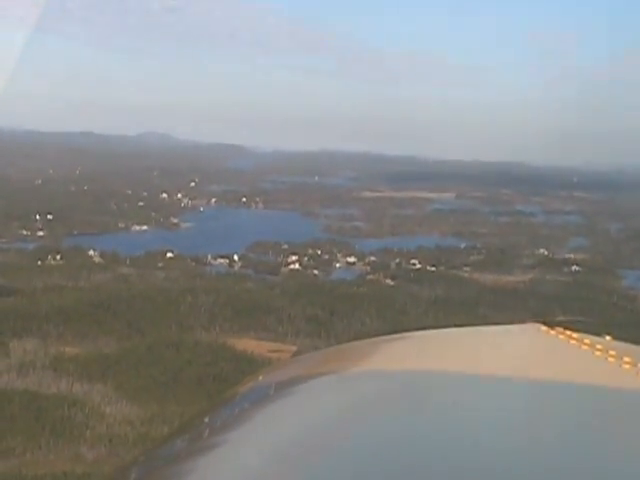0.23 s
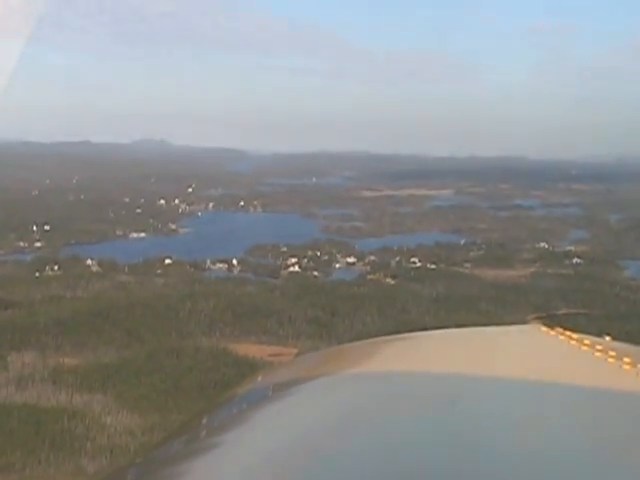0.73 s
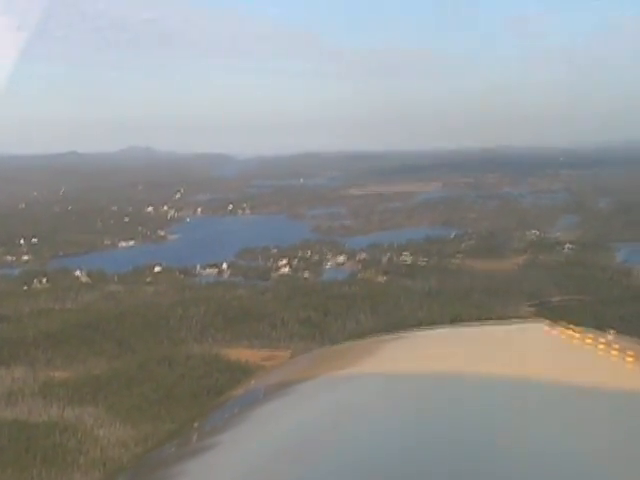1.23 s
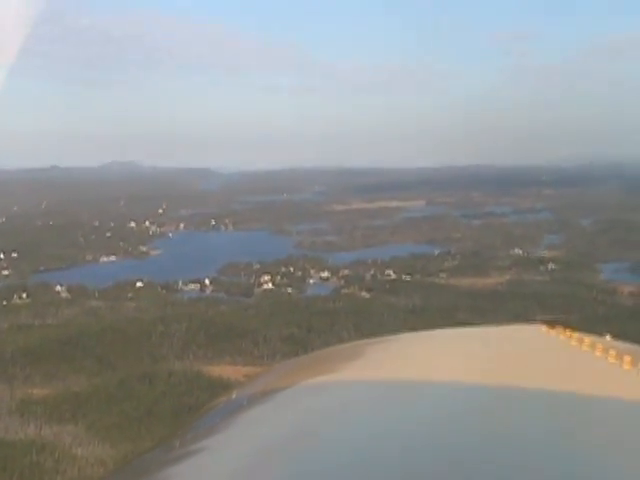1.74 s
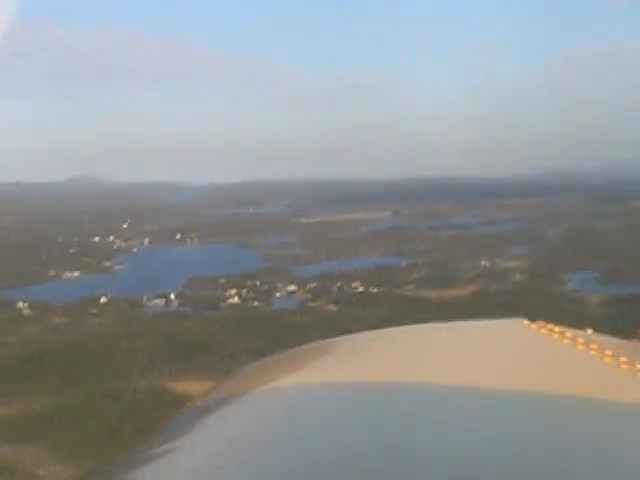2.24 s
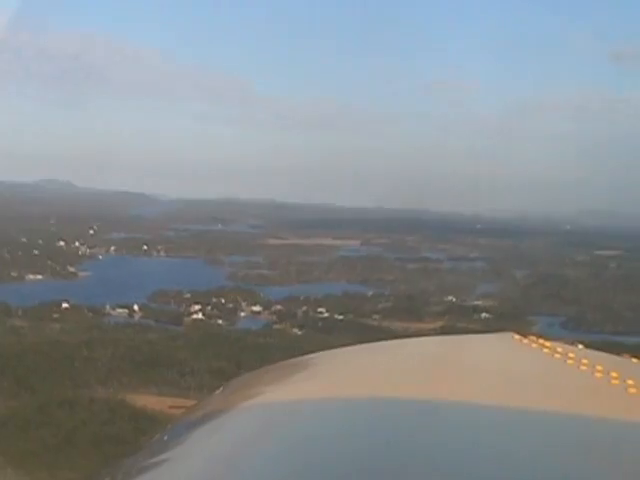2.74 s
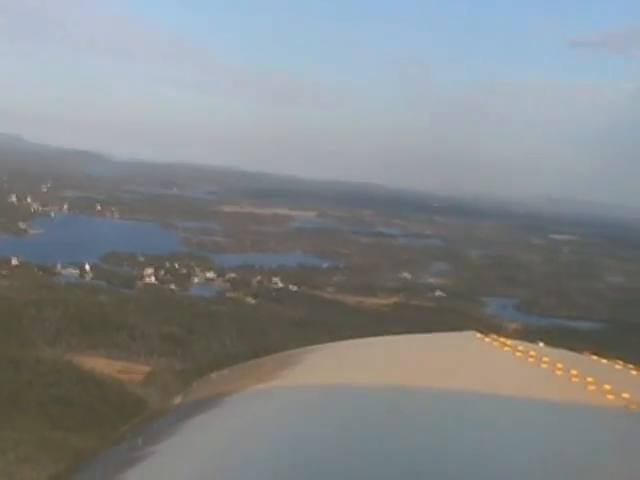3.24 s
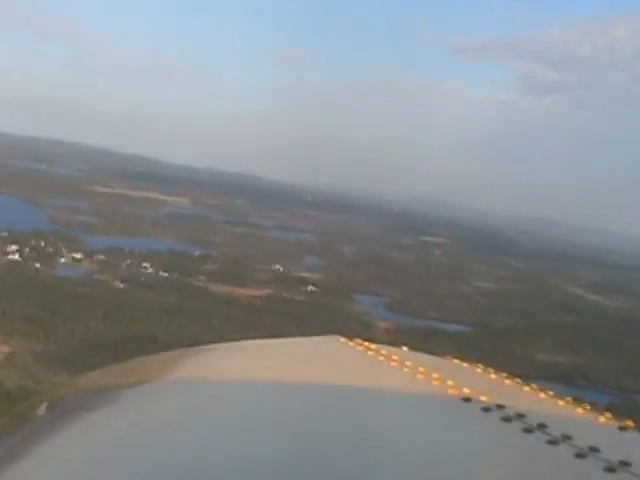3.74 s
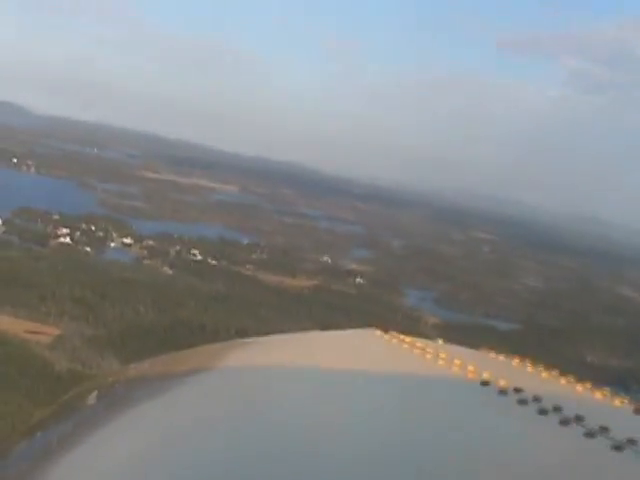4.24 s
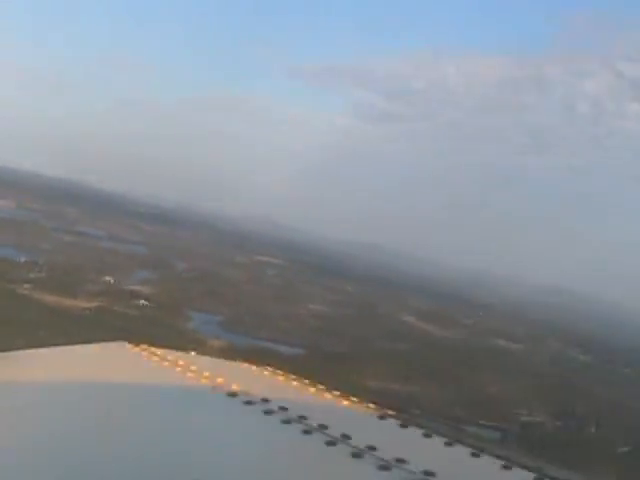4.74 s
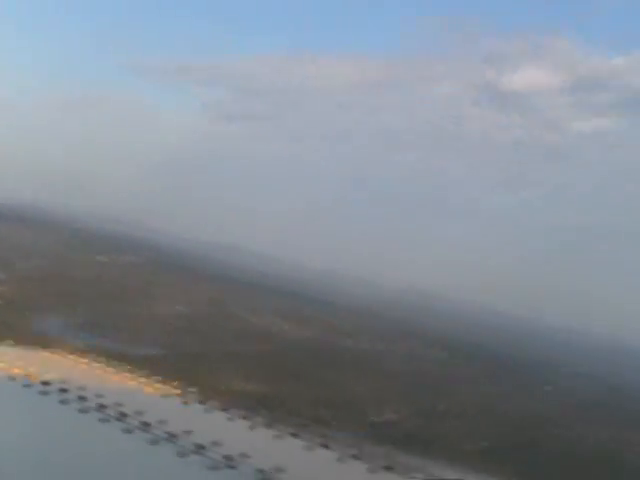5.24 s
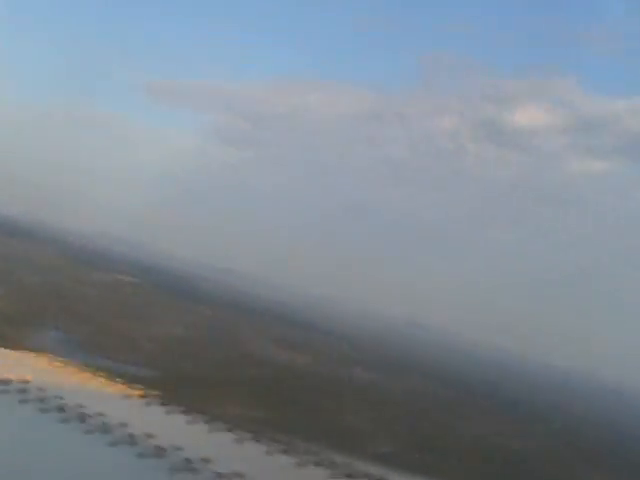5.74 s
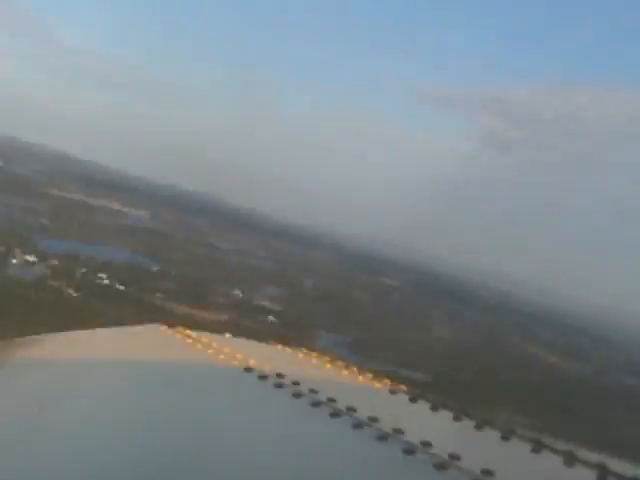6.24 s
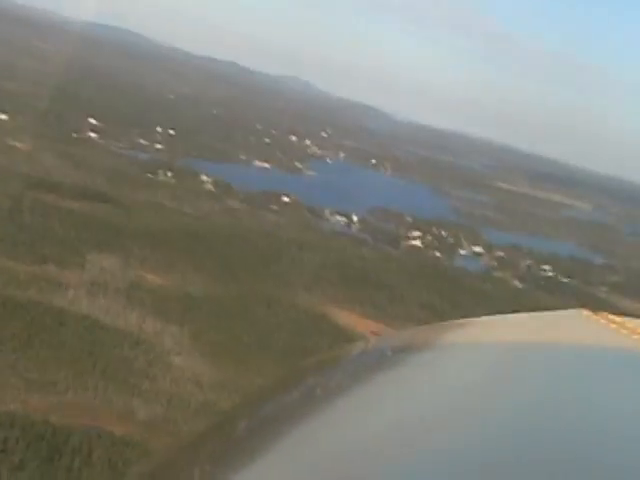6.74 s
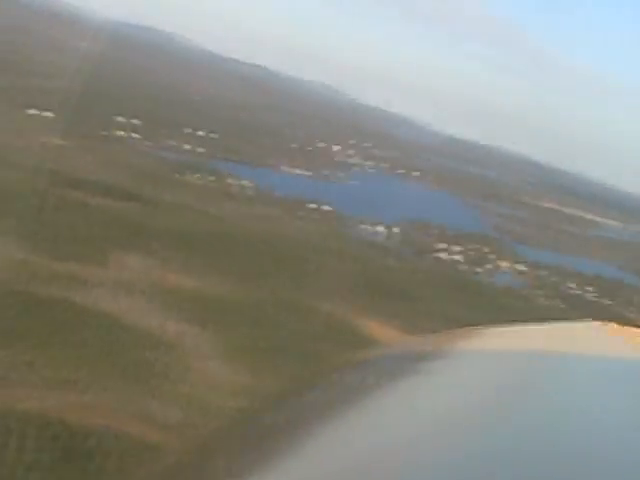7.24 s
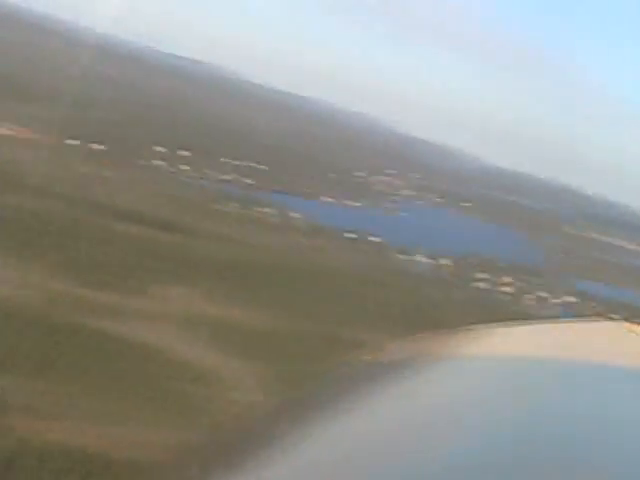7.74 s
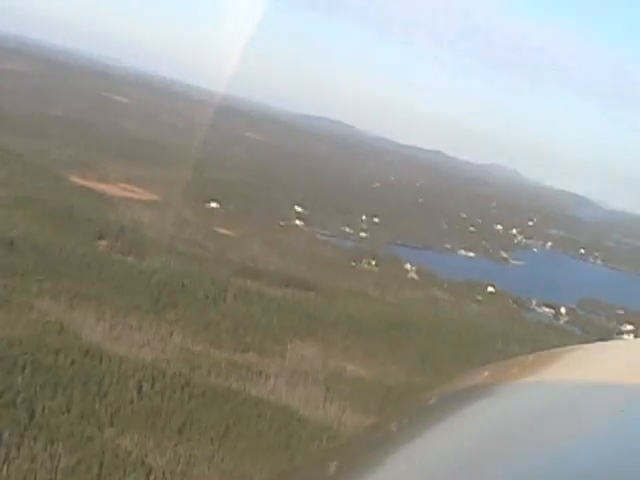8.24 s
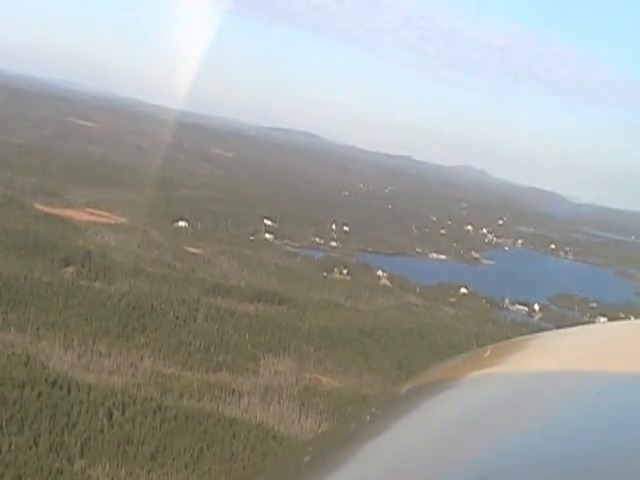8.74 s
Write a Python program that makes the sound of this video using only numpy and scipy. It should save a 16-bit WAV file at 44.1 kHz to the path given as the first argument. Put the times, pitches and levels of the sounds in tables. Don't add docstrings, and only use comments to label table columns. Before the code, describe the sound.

A deep, rough, four-cylinder engine drone with propeller throb fills a cramped light-plane cabin without pause, its pitch almost fixed. Broad air roar surrounds it, with a slightly wavering thin mechanical whine on top. A loud, dry click hits the camera body near the middle; about two seconds later come a muted push and a tiny click. The stereo pickup is close, boxy and bass-heavy, while the drone continues to the end.

```python
import sys
import numpy as np
from scipy import signal
from scipy.io import wavfile
from scipy.ndimage import uniform_filter1d

SR = 44100
rng = np.random.default_rng(int(sys.argv[2]) if len(sys.argv) > 2 else 0)


def master(y):
    cut = np.clip(np.atleast_2d(y).T, -1, 1)
    pcm = np.round(cut * 32767)
    wavfile.write(sys.argv[1], SR, pcm.astype(np.int16))


def attenuation_scalar(level_db):
    decades = np.asarray(level_db, float) / 20
    return 10 ** decades


N = 396018
BLOCK = 32

# time_s, cycle_hz
ENGINE_SPEED = [(0, 35.232), (.9, 35.24), (1.9, 35.312), (3.2, 35.263), (4.8, 35.419), (5.3, 35.41),
                (5.6, 35.49), (6.8, 35.48), (7.8, 35.6), (8.4, 35.585), (9, 35.49)]
# time_s, turned_aside_0_to_1, in_line_with_gearbox_0_to_1
CAMERA_AIM = [(0, 0.05, 0.5), (1.3, 0, 0.77), (2, 0, 0.5), (2.9, 0, 0.35), (3.5, 0.03, 0.78),
              (4.3, 0.1, 0.87), (5, 0.8, 1), (6.1, 1, 0.94), (6.9, 1, 0.6), (7.7, 0.9, 0.87),
              (8.4, 0.82, 0.85), (9, .95, 0.74)]
STRONG_ORDERS = [(1, -44, -44), (2, -29, -29), (3, -36, -34), (4, -22, -21), (5, -37, -34), (6, -24, -26),
                 (7, -39, -38), (8, -24, -22), (9, -44, -52), (10, -40, -37), (11, -34, -37),
                 (12, -45, -38), (13, -40, -42), (14, -45, -43), (15, -37, -42), (16, -49, -39),
                 (17, -38, -35), (27, -44, -48), (29, -42, -42), (32, -37, -40), (35, -35, -44),
                 (46, -38, -44), (48, -39.5, -45), (60, -52, -57), (90, -47.5, -40), (132, -61, -71),
                 (84, -54, -57), (86, -58, -46), (88, -54, -46), (226, -75, -73)]
INVERTED_ORDERS = (5, 11, 15, 17)
# frequency_hz, ahead_db_rms, aside_db_rms
CRANKCASE = [(640, -63, -51.5), (1080, -55, -49.5), (1180, -43, -49), (1820, -49, -48), (1890, -65, -58),
             (2540, -69, -62), (3010, -49.5, -47.5), (3540, -63.5, -65)]
PROPELLER = [
    (1, -40),
    (3, -25),
    (6, -33),
]
# frequency_hz, ahead_db_per_hz, aside_db_per_hz
CABIN_ROAR = [(35, -49, -45), (86, -48.5, -50.5), (118, -43.5, -44), (189, -43.5, -44), (275, -46, -45),
              (319, -48.5, -48.5), (550, -52.5, -51), (850, -58.5, -59.5), (1270, -57, -55),
              (1280, -58.5, -66), (1590, -60, -61), (1870, -66, -68), (2440, -70.5, -71),
              (5660, -84.5, -83)]
# centre_hz, width_hz, ahead_db, aside_db
CABIN_RESONANCES = [(909, 45, 3, 5.5), (3220, 275, 5, 9.5), (4570, 240, 4, 0.5), (11500, 1100, -1, -0.5)]
# frequency_hz, left_lead_rad, left_minus_right_db, likeness_0_to_1
MIC_PORTS = [(30, 2.85, -.8, .997), (60, 2.62, -.4, .997), (120, 2.14, 1.4, .985), (200, 1.36, 4.4, .96),
             (300, .72, 6.8, .86), (450, 0, 4.2, .87), (700, -.35, 1.4, .85), (1200, -.48, -.3, .93),
             (2200, -.62, -1.9, .8), (4000, -.9, -2.5, .72), (6000, -1.5, -1.3, .66), (8500, -2, -.2, .74),
             (11500, -2.95, -.1, .92)]
# start_s, level_db
CLICKS = [
    (4.0195, 0),
    (6.2675, -19),
]
# pitch_hz, left_db, right_db, rise_s
BODY_MODES = [(637, 0.5, -13, 0.0012), (1025, -12, -3, 0.0015), (1700, -20, -17, 0.0013),
              (2700, -17, -15, 0.0014), (3300, -16, -21, .0009), (4520, -14, -11.5, 0.001),
              (5700, -22, -14, 0.0008), (7400, -17, -14, 0.00071), (9100, -24, -25, 0.00057),
              (10900, -25, -24, 0.00053)]
# start_s, pitch_hz, level_db, rise_s
HOUSING_PUSH = (6.115, 432, -18, .02)


def evened(x):
    return x / np.sqrt(np.mean(abs(x) ** 2) + 1e-20)


def read(table, hz, axis=1):
    table = np.array(table)
    return np.interp(np.log(hz + 1), np.log(table[:, 0] + 1), table[:, axis])


def follow(table, t, axis=1):
    table = np.array(table)
    return np.interp(t, table[:, 0], table[:, axis])


def drift(t, rate_hz):
    f = np.geomspace(.1, rate_hz, num=16)[:, None] * rng.uniform(.9, 1.1, (16, 1))
    waves = np.sin(2 * np.pi * (f * t + rng.random((16, 1))))
    return evened((waves / np.sqrt(f)).sum(0))


def ports(hz):
    turn = np.exp(.5j * read(MIC_PORTS, hz, axis=1))
    lean = attenuation_scalar(read(MIC_PORTS, hz, axis=2))
    return np.array([lean * turn, 1 / turn]) * np.sqrt(2 / (1 + lean ** 2))


def order_levels():
    top_odd, top_order = 55, 100
    firing_db, odd_db, uneven_db = 4, -2, 2
    uneven = uneven_db * rng.standard_normal((top_order + 1, 2))
    levels = {}
    for order in range(18, top_order + 1):
        if order % 2 == 0 or order <= top_odd:
            step_db = firing_db * (order % 4 == 0) + odd_db * (order % 2)
            hz = order * np.mean(ENGINE_SPEED, 0)[1]
            case_db = [read(CRANKCASE, hz, axis=k) for k in (1, 2)]
            levels[order] = case_db + uneven[order] + step_db
    for order, *db in STRONG_ORDERS:
        levels[order] = db
    return levels


def tone(cycles, multiple, db, phase, waver_db, scatter):
    t = np.arange(len(cycles)) * BLOCK / SR
    shared = attenuation_scalar(db + waver_db * drift(t, 6.))
    shared = shared * np.exp(1j * (phase + 0.25 * waver_db * drift(t, 8.)))
    own = 1 + scatter * np.array([drift(t, 1.56) + 1j * drift(t, 1.47) for _ in range(2)])
    own = own / np.sqrt(1 + 2 * scatter ** 2)
    gains = ports(multiple * np.mean(ENGINE_SPEED, 0)[1])[:, None] * shared * own
    turning = np.exp(2j * np.pi * multiple * cycles)
    return np.sqrt(2) * (gains[:, :, None] * turning).real


def machinery():
    mesh_order, mesh_hidden_db, mesh_in_line_db = 44, -54.5, -30
    reduction = 2.276
    t = np.arange((N // BLOCK + 1) * BLOCK) / SR
    block_t = t[::BLOCK]
    cycle_hz = follow(ENGINE_SPEED, t) + .004 * drift(block_t, 9.1).repeat(BLOCK)
    cycles = np.cumsum(cycle_hz).reshape(-1, BLOCK) / SR
    aside = follow(CAMERA_AIM, block_t, axis=1)
    in_line = follow(CAMERA_AIM, block_t, axis=2)
    out = 0
    for order, (ahead_db, aside_db) in order_levels().items():
        db = ahead_db + np.clip(aside, 0, 1) * (aside_db - ahead_db)
        if order == mesh_order:
            db = mesh_hidden_db + in_line * (mesh_in_line_db - mesh_hidden_db)
        lined_up = order <= 17 or 84 <= order <= 96
        phase = rng.standard_normal() * (order / 90 if lined_up else 3.)
        phase += np.pi * (order in INVERTED_ORDERS)
        phase += 2.05 - 1.6 / (1 + (order / 8) ** 4)
        high = min(order / 30, 1) ** 2
        out = out + tone(cycles, order, db, phase, .8 + .6 * high, .025 + .16 * high)
    for multiple, db in PROPELLER:
        out = out + tone(cycles, round(multiple) * 2 / reduction, db, 0, 1.2, .03)
    return out.reshape(2, -1)[:, :N], cycles.ravel()[:N]


def roar(cycles):
    frames, hz = N // 1024 + 5, np.fft.rfftfreq(4096, 1 / SR)
    a, b, c, d, patches = rng.standard_normal((frames, len(hz), 5)).T
    patches = uniform_filter1d(patches, size=40, axis=0)
    patches = evened(uniform_filter1d(patches, size=6, axis=1))
    t = np.arange(frames) * 1024 / SR
    aside = np.clip(follow(CAMERA_AIM, t), 0, 1)
    in_line = np.clip(follow(CAMERA_AIM, t, axis=2), 0, 1)

    ahead_db, aside_db = read(CABIN_ROAR, hz, axis=1), read(CABIN_ROAR, hz, axis=2)
    for centre_hz, width_hz, hump_ahead_db, hump_aside_db in CABIN_RESONANCES:
        bell = np.exp(-.5 * ((hz - centre_hz) / width_hz) ** 2)
        ahead_db = ahead_db + hump_ahead_db * bell
        aside_db = aside_db + hump_aside_db * bell
    db = ahead_db[:, None] + aside * (aside_db - ahead_db)[:, None]
    db = db + 1.1 * patches + 0.13 * drift(t, 3.)

    hand_s, hand_half_s, hand_db = 5.92, .13, -5
    middle_db = -2.5 * aside + hand_db * np.exp(-((t - hand_s) / hand_half_s) ** 2)
    hiss_db = 2.5 * in_line ** 2.5
    for centre_hz, octaves, shade_db in [(890, 0.7, middle_db), (9000, 0.81, hiss_db)]:
        bell = np.exp(-.5 * (np.log2((hz + 1) / centre_hz) / octaves) ** 2)
        db += bell[:, None] * (shade_db - shade_db.mean())

    likeness = np.clip(read(MIC_PORTS, hz, axis=3), 0, 1)[:, None]
    left = a + 1j * b
    right = likeness * left + np.sqrt(1 - likeness ** 2) * (c + 1j * d)
    spectra = np.array([left, right]) * ports(hz)[:, :, None] * attenuation_scalar(db)
    air = attenuation_scalar(10.0) * signal.istft(spectra, nperseg=4096, noverlap=3072)[1][:, :N]
    upper = signal.sosfiltfilt(signal.butter(2, 900, "high", fs=SR, output="sos"), air)
    puff = .1 * np.cos(4 * np.pi * cycles) + .07 * np.cos(8 * np.pi * cycles)
    return air + puff * upper


def click():
    t, out = np.arange(2000) / SR, np.zeros((2, N))
    fizz = attenuation_scalar(-22.5 - 60 * t / .045) * np.clip(t / .001, 0, 1)
    snap = fizz * rng.standard_normal((2, len(t)))
    for hz, left_db, right_db, rise_s in BODY_MODES:
        sharpness = 2 if hz < 2000 else 7
        swell = (t / rise_s * np.exp(1 - t / rise_s)) ** sharpness
        ringing = np.sin(2 * np.pi * hz * t + np.c_[np.angle(ports(hz))])
        snap = snap + attenuation_scalar(np.c_[[left_db, right_db]]) * swell * ringing
    for start_s, db in CLICKS:
        start = round(start_s * SR)
        out[:, start:start + len(t)] = attenuation_scalar(db) * snap
    return out


def knock():
    start_s, hz, db, rise_s = HOUSING_PUSH
    t = np.maximum(np.arange(N) / SR - start_s, 0)
    swell = (t / rise_s * np.exp(1 - t / rise_s)) ** 2
    return attenuation_scalar(db) * swell * np.sin(2 * np.pi * hz * t) * np.c_[[1, -.4]]


def scene():
    lines, cycles = machinery()
    return lines + roar(cycles) + click() + knock()


def roll_off(x):
    return signal.sosfilt(signal.butter(12, 15030, fs=SR, output="sos"), x)


def record(dry):
    cut = signal.sosfilt(signal.butter(7, 29.5, "high", fs=SR, output="sos"), dry)
    cut = signal.sosfilt(signal.butter(8, 11900, fs=SR, output="sos"), cut)
    offset = np.array([[.0003], [.0082]])
    return roll_off(np.clip(cut + offset, -1, 1))


dry = scene()
out = record(dry)
master(out)
```